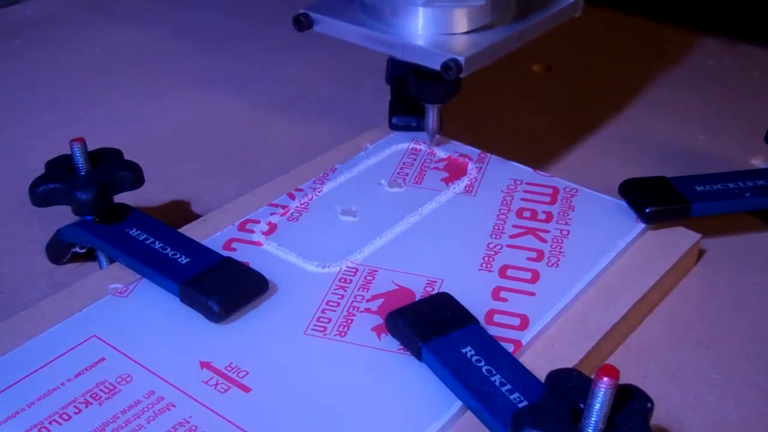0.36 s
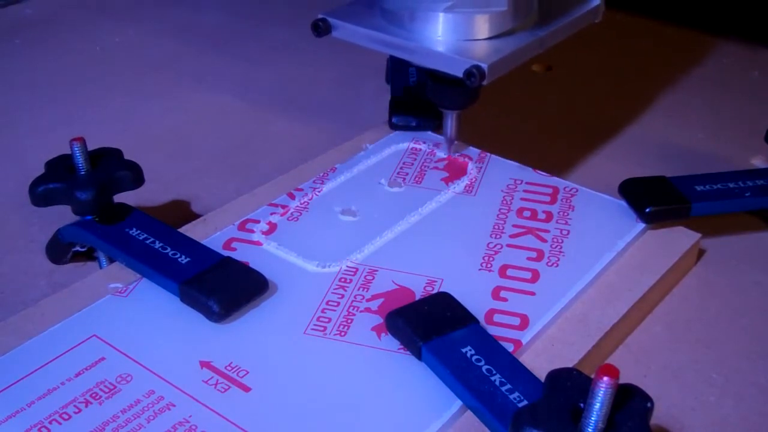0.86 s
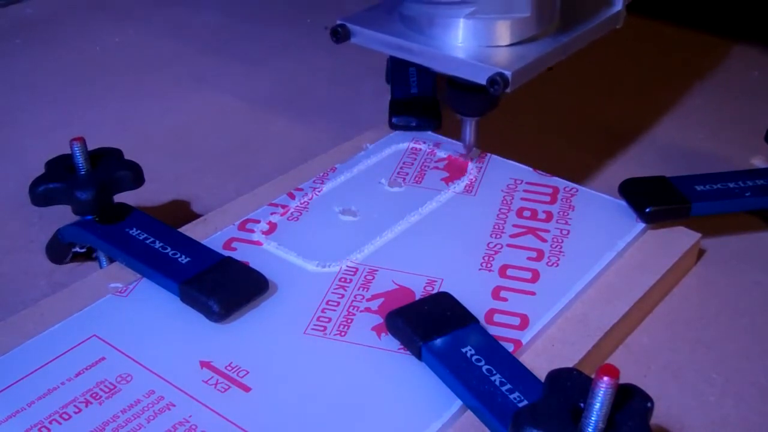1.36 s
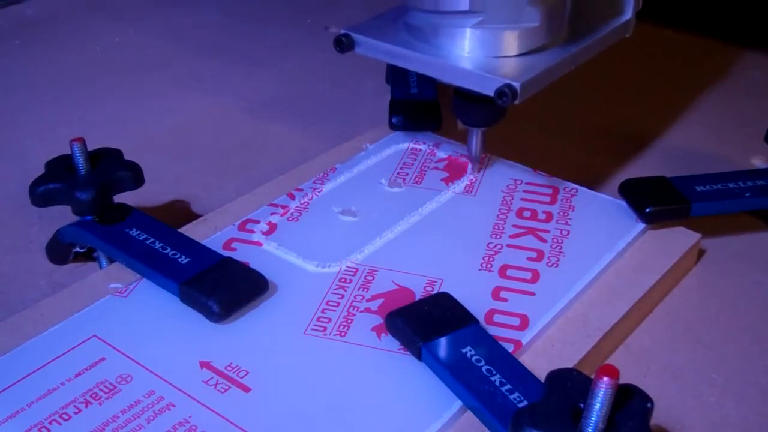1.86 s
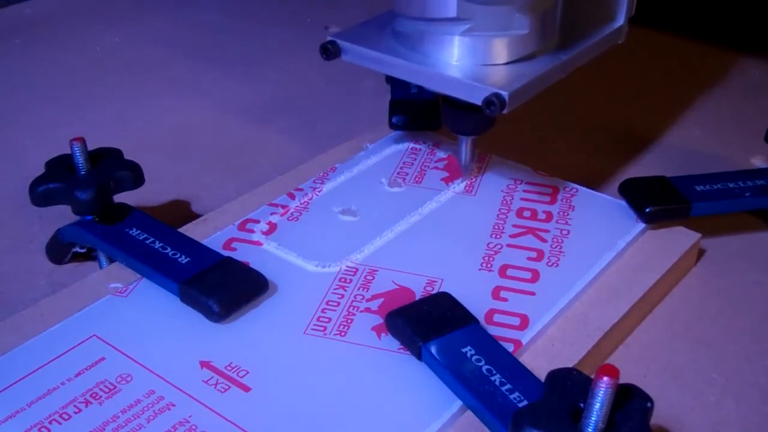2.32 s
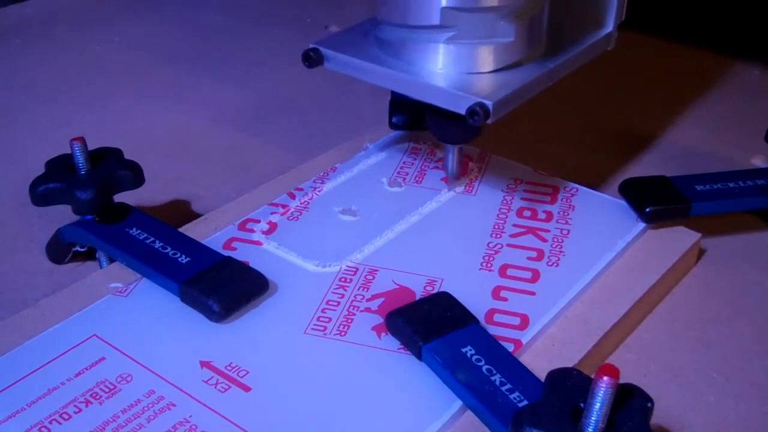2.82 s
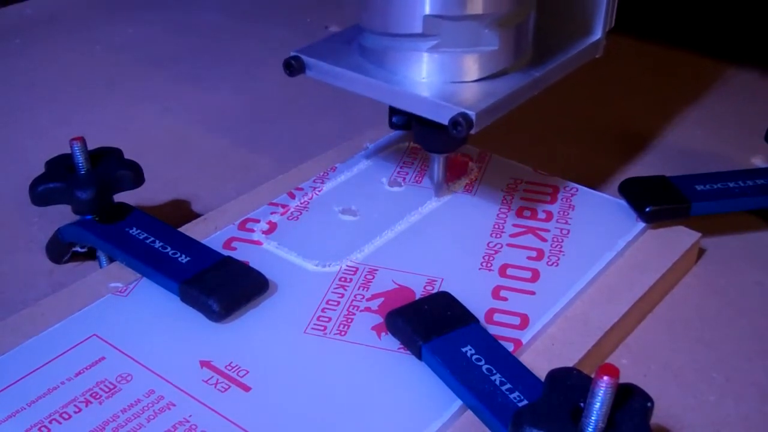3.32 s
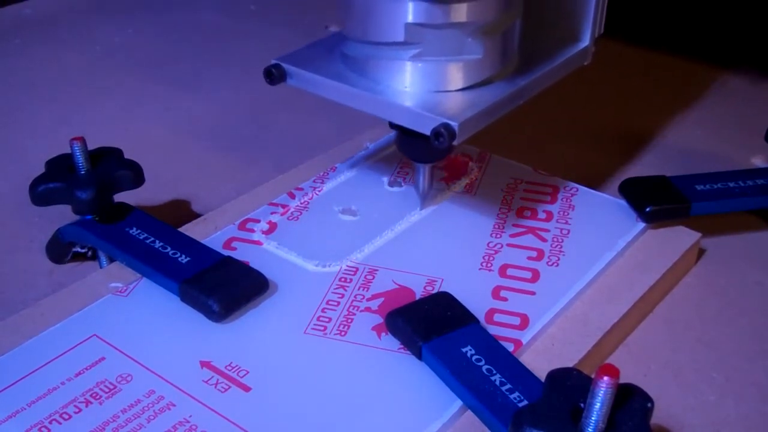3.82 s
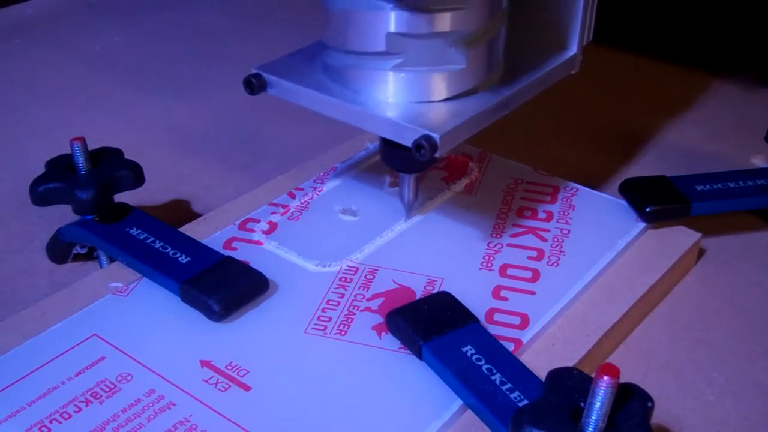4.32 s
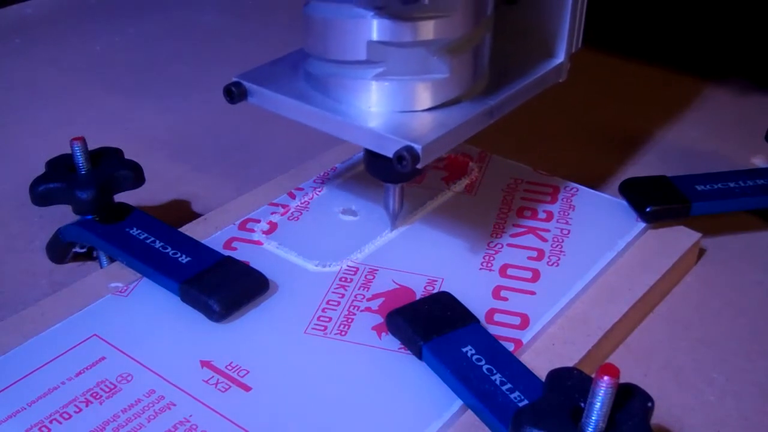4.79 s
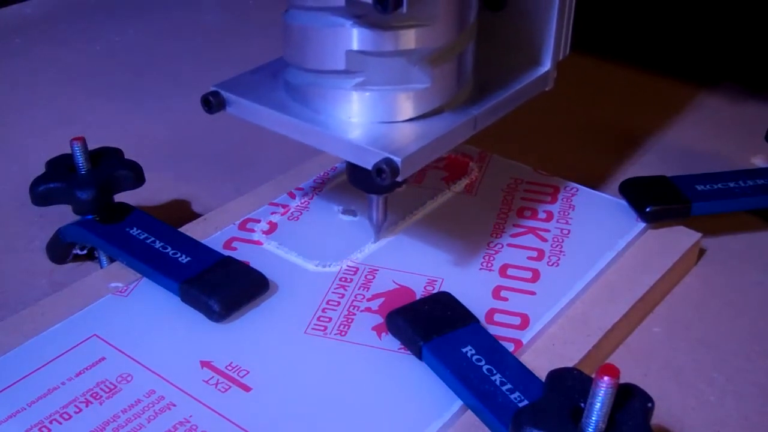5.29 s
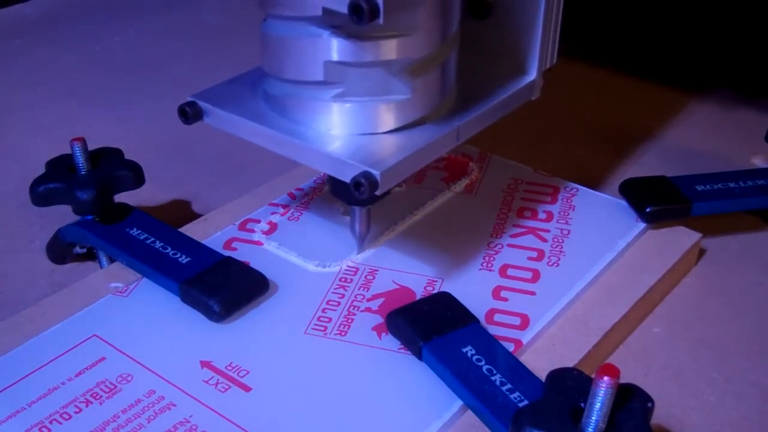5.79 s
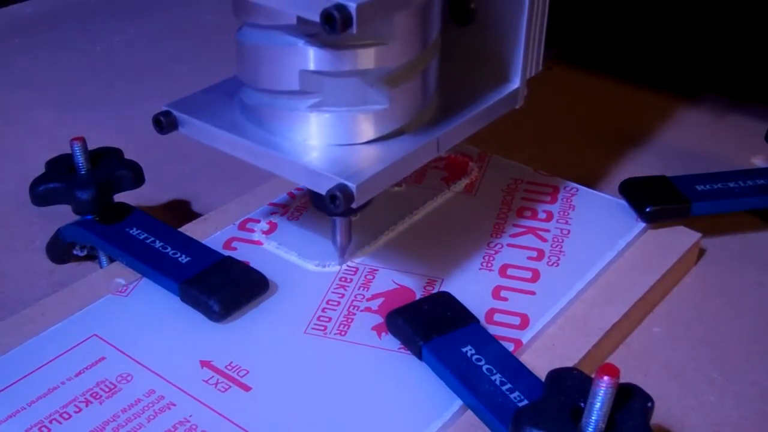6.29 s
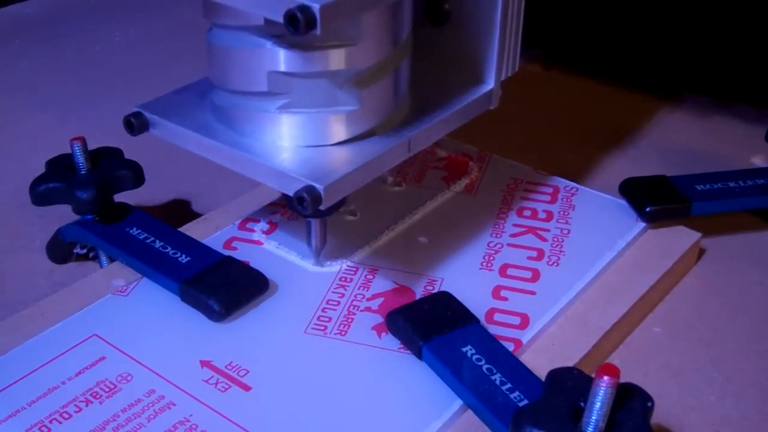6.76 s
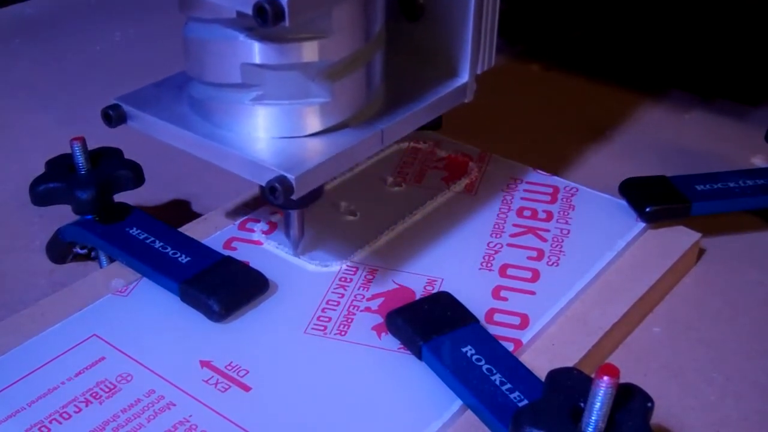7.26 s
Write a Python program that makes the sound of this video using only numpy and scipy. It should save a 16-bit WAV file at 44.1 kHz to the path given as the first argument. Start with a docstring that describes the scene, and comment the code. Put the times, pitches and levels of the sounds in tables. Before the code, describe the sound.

A router spindle already at full speed whines on a steady stack of clean tones, wrapped in a strong, bright hiss of cooling air. Underneath, soft axis motors hum low, sagging in pitch at turns near the start, before two seconds and late on. The hiss changes colour as the head travels. Close stereo pickup in a workshop, left side louder, no start or stop.

```python
"""A router spindle spins at full speed and follows a groove in a clamped plastic sheet.
Shaft and ball bearing whine in clean sines on multiples of the shaft angle; cooling air roars as
coloured stereo noise. The axis motors hum at their own step rate, gliding at the corners.
The colour shifts as the head travels; the left microphone faces the machine."""
import sys
import numpy as np
from scipy import signal
from scipy.fft import rfft, irfft, next_fast_len
from scipy.io import wavfile

SR = 44100
rng = np.random.default_rng(int(sys.argv[2]) if len(sys.argv) > 2 else 0)


def ratio_of_db(decibels):
    """Turn decibels (scalar or array-like) into linear amplitude factors; 0 dB maps to 1."""
    return 10 ** (np.asarray(decibels, float) / 20)


def pcm_store(signal):
    """Save signal as 16-bit PCM."""
    levels = np.round(np.clip(np.atleast_2d(signal), -1, 1) * 32767)
    wavfile.write(sys.argv[1], SR, levels.astype(np.int16).T)


N = 336471


def in_time(rows):
    """Columns of a table, after its time column, as sample-by-sample curves."""
    time_s, *columns = np.transpose(rows)
    return [np.interp(np.arange(N) / SR, time_s, column) for column in columns]


def at_hz(hz, table, column=1):
    """Reads a column of a spectrum on a log frequency axis."""
    rows = np.array(table)
    return np.interp(np.log(hz + 1e-9), np.log(rows[:, 0]), rows[:, column])


def drift(rate_hz):
    """Slow chance of spread 1: noise through a two-pole lowpass at SR / 40, then interpolated."""
    pole = np.exp(-80 * np.pi * rate_hz / SR)
    noise = rng.standard_normal(N // 40 + 2002)
    slow = signal.lfilter([1], [1, -2 * pole, pole * pole], noise)[2000:]   # settled part
    return np.interp(np.arange(N) / 40, np.arange(len(slow)), slow / slow.std())


# spindle speed: time_s, turns_per_s
SPINDLE_SPEED = [(0.1, 512.9), (0.6, 513.2), (1.9, 515.4), (3.4, 515.15), (5.8, 515.72), (7.4, 515.3)]


def shaft_angle():
    """Shaft angle in radians, the running sum of the spindle speed."""
    return 2 * np.pi * np.cumsum(in_time(SPINDLE_SPEED)[0]) / SR


# air roar at the microphones, before shading:
# pitch_hz, left_db_per_hz, right_db_per_hz, likeness (0-1), right_lead_rad
AIR_SPECTRUM = [(40, -103, -106, 0, 0.56), (90, -102, -108, 0, -0.12), (153, -92.5, -101, 0.17, -0.003),
                (480, -86.5, -96, .44, -0.64), (770, -83.5, -89, 0.66, 0.52),
                (1380, -83.5, -86.5, 0.5, -0.68), (2240, -77, -80, 0.86, -0.12),
                (3415, -73.5, -77.5, 0.71, -0.41), (4640, -65.5, -71, 0.93, 0.85),
                (5500, -64.5, -71, 0.89, -0.43), (6120, -66.5, -72, 0.84, -0.42),
                (7010, -73.5, -79, 0.59, 0.25), (9150, -73.5, -85.5, 0.47, 0.23),
                (10870, -80.5, -92, 0.3, 1.7), (11960, -91, -91, 0.6, 1.55), (13700, -95, -97.5, 0.5, 1.4)]
# housing resonances in the roar: centre_hz, width_hz, peak_db
HOUSING_RESONANCES = [(1549, 180, 7), (1106, 160, 3), (9270, 230, 2.0)]


def roar_spectrum(hz, size):
    """Turbulence as Gaussian noise, coloured per side, partly alike and phase-shifted between sides."""
    shared, apart = rfft(rng.standard_normal((2, size))) * np.sqrt(SR / 2)
    alike = np.clip(at_hz(hz, AIR_SPECTRUM, column=3), 0, 0.99)
    shared = np.sqrt(1 + alike) * shared
    apart = np.sqrt(1 - alike) * apart
    left = (shared + apart) * ratio_of_db(at_hz(hz, AIR_SPECTRUM, column=1))
    right = (shared - apart) * ratio_of_db(at_hz(hz, AIR_SPECTRUM, column=2))
    right = right * np.exp(1j * at_hz(hz, AIR_SPECTRUM, column=4))
    peaks_db = sum(peak_db / (1 + (2 * (hz - centre_hz) / width_hz) ** 2)
                   for centre_hz, width_hz, peak_db in HOUSING_RESONANCES)
    return np.array([left, right]) * ratio_of_db(peaks_db) / np.sqrt(2)


# head travel: time_s, bearing (-1 near side .. 1 far side), roar_db, treble_db, rumble_db
HEAD_TRAVEL = [(0.0, 0.17, 0.9, -0.26, -3), (0.38, 0.33, 1.1, .5, -0.5), (0.76, .7, 0, -0.47, -6.5),
               (1.14, 1, 0.2, -.2, -4), (1.55, 0.94, -0.5, -1.9, 6), (2.0, 0.71, -1, 0.21, 3.5),
               (2.6, 0.36, -0.6, 0, -2), (3.05, 0.2, -1, .1, -2), (3.6, -0.17, -.5, .5, -1.5),
               (3.85, -0.021, 0, 0.37, -3), (4.3, -0.47, 0.05, 1.5, 1), (5.0, -.6, -.5, -0.19, 1),
               (5.4, -0.55, -1, -.3, 2), (6.1, -.9, 0.2, .8, 3), (6.5, -0.73, 0, 0.23, 4.5),
               (7.0, -1.2, 0.8, -0.83, 5), (7.63, -1.0, 0.8, -0.24, 2)]
# roar regions: pitch_hz, gain_db at bearing 1, roar_share, treble_share, rumble_share
ROAR_SHADE = [(100, -1.5, .1, 0, 0.81), (400, -0.4, .8, 0.54, 0.35), (1380, 0.5, 0, 0.6, 0.087),
              (2500, 1.5, 1.9, 0, 0), (3500, 0.4, 1.5, 0.33, 0), (4700, -1, 0.56, 0.04, 0),
              (5160, -0.7, 0.8, 0.35, 0.081), (6200, 2.5, .4, 0.093, 0.12), (7100, 1.2, 1.8, 0, 0.19),
              (8200, 0, 0, 1.4, 0), (9400, 0.1, 0.014, 0.82, 0.019), (12000, 0, 0.21, 0, 0)]
# unsteadiness of the roar: pitch_hz, spread_db
ROAR_FLUTTER = [(100, 3.5), (400, 1.5), (3000, .5), (9000, 0.6), (12000, 0.9)]
# phase swing of the right side: pitch_hz, swing_rad at bearing 1
PHASE_SWING = [(3000, 0.28), (5500, 0.36), (9400, 0.58), (12000, 0.66)]


def air(shaft, throb):
    """Cooling-air turbulence, shaded region by region as the head travels, throbbing once a turn."""
    size = next_fast_len(N)
    hz = np.arange(size // 2 + 1) * SR / size
    roar = roar_spectrum(hz, size)
    bearing, *levels_db = in_time(HEAD_TRAVEL)
    log_regions = np.log(np.array(ROAR_SHADE)[:, 0])
    out = 0
    for k, (region_hz, facing_db, *shares) in enumerate(ROAR_SHADE):
        # triangular band around region_hz
        region = np.interp(np.log(hz + 1e-9), log_regions, np.arange(len(ROAR_SHADE)) == k)
        shade_db = facing_db * bearing + np.dot(shares, levels_db)
        flutter_db = at_hz(region_hz, ROAR_FLUTTER) * drift(11.5)
        part = irfft(roar * region, size)[:, :N]
        quadrature = irfft(1j * roar[1] * region, size)[:N]
        turn_rad = at_hz(region_hz, PHASE_SWING) * bearing
        part[1] = part[1] * np.cos(turn_rad) + quadrature * np.sin(turn_rad)
        out = out + part * ratio_of_db(shade_db + flutter_db)
    return out * (1 + throb * np.sin(shaft))


# stereo placement of tones: pitch_hz, left_minus_right_db
TONE_PAN = [(190, 2), (515, 2.5), (1030, 4.0), (1600, 3), (2600, 3), (6200, 5.7), (12400, 14)]


def tone(angle, level_db, waver_db):
    """A sine of rms level_db, wavering slowly, placed left by its mean pitch."""
    mean_hz = abs(angle[-1]) / (2 * np.pi) * SR / N
    pan_db = at_hz(mean_hz, TONE_PAN)
    gain = np.sqrt(2) * ratio_of_db(level_db + waver_db * drift(3.5))
    wave = gain * np.sin(angle + rng.uniform(0, 2 * np.pi))
    sides = ratio_of_db(np.array([[pan_db / 2], [-pan_db / 2]]))
    return wave * sides / sides.mean()


# strongest tones as the head travels: time_s, order_1_db, order_2_db, order_4_db, ball_pass_db
STRONG_TONES = [(0.05, -57.5, -56.5, -49, -47.5), (0.2, -48.5, -61, -56, -49.5),
                (0.38, -49.5, -47.5, -58, -47.5), (0.65, -52.5, -51, -57.5, -50),
                (1.1, -50, -48.5, -53, -51), (1.55, -50.5, -48, -52.5, -51.5), (2.0, -51, -49, -62, -57.5),
                (2.5, -51.5, -51, -56.5, -52.5), (3.1, -52.7, -52, -70, -50.5),
                (3.6, -52.5, -51.5, -59, -50.5), (4.1, -51, -54.5, -58, -47.5),
                (4.8, -50.5, -54, -63, -47.5), (5.5, -50, -56, -63, -50.5), (6.2, -50.5, -52.5, -82, -49.5),
                (6.8, -53, -57, -58, -51), (7.58, -52.5, -66, -65, -48)]
# tones that swell and fade through reflections:
# shaft_order, ball_pass_multiple, direct_db at the start, growth_db_per_s, loudest_s, swell_period_s
FADING_TONES = [(3, 0, -63, -.2, 4.45, 2.85), (5, 0, -65, .8, 4.35, 3.1), (2, 1, -61, -.2, 3.9, 4.2),
                (0, 2, -61, -.5, 3.3, 6.5), (16, 0, -67, 0, 4.3, 2.9), (24, 0, -81, .4, 6.9, 7)]
# tones that only waver: shaft_order, ball_pass_multiple, level_db
FAINT_TONES = [(6, 0, -72), (8, 0, -63), (-1, 1, -78), (1, 1, -68), (3, 1, -69), (-4, 2, -76), (-3, 2, -85)]
# whine of the twelve fan blades, heard when the head faces the microphones: time_s, level_db
BLADE_WHINE = [(0.0, -58), (1.4, -63), (4.3, -67), (5.9, -64), (6.2, -51), (7.63, -53)]
BALL_PASS = 3.0735   # balls crossing a spot on the bearing race, per turn
REFLECTION = 0.7   # amplitude ratio, reflected to direct


def spindle(shaft):
    """Unbalance and fan sound on whole shaft orders; the bearing adds a tone between them, with its sums."""
    t = np.arange(N) / SR
    out = tone(12 * shaft, in_time(BLADE_WHINE)[0], waver_db=1.5)
    for order, level_db in zip([1, 2, 4, BALL_PASS], in_time(STRONG_TONES)):
        out = out + tone(order * shaft, level_db, waver_db=0.3)
    for order, balls, direct_db, growth_db_per_s, loudest_s, period_s in FADING_TONES:
        direct = tone((order + balls * BALL_PASS) * shaft, direct_db + growth_db_per_s * t, waver_db=0.5)
        path_rad = 2 * np.pi * (t - loudest_s) / period_s
        out = out + direct * np.sqrt(1 + REFLECTION ** 2 + 2 * REFLECTION * np.cos(path_rad))
    for order, balls, level_db in FAINT_TONES:
        out = out + tone((order + balls * BALL_PASS) * shaft, level_db, waver_db=3.0)
    return out


# corners where the motors slow down: slowest_s, step_rate_hz
CORNER_RATES = [(0.0, 140), (1.7, 118), (6.68, 146)]
CRUISE_HZ = 190.8   # step rate on a straight cut
BRAKE_S, SPEED_UP_S = 0.36, 0.5


def step_rate():
    """Step rate in Hz: cruise, even braking into each corner, easing back up after it."""
    t, step_hz = np.arange(N) / SR, CRUISE_HZ
    for slowest_s, slow_hz in CORNER_RATES:
        braking = np.clip(1 + (t - slowest_s) / BRAKE_S, 0, 1)
        speeding_up = np.clip(1 - (t - slowest_s) / SPEED_UP_S, 0, 1) ** 2
        step_hz = step_hz - (CRUISE_HZ - slow_hz) * np.where(t < slowest_s, braking, speeding_up)
    return step_hz


# axis motors taking turns along the path: time_s, hum_db, octave_db, cutter_shake_db before corner easing
AXIS_LEVELS = [(0.0, -98, -86, -78), (0.3, -87, -79, -76), (0.6, -86, -84, -73), (1.2, -82, -77, -74),
               (1.45, -90, -78, -72), (1.72, -80, -74, -72), (1.88, -72, -72, -70), (2.05, -71, -67.5, -68),
               (2.8, -74, -72, -67.5), (4.0, -76, -72.5, -67.5), (4.4, -68.5, -76, -65),
               (5.6, -66, -79, -64), (6.35, -67, -73, -70), (6.5, -71, -68, -72), (6.7, -83, -80, -74),
               (6.85, -69, -87, -76), (7.05, -92, -86, -79), (7.4, -74, -84, -82), (7.63, -82, -86, -77)]
# stepping shakes the cutter and beats with the shaft: shaft_order, step_multiple, db_from_shake
SHAKE_BEATS = [(2, -1, -0.5), (1, 1, -6), (1, -1, -13), (0, 4, -11.5), (0, 3, -12)]
CORNER_SHAKE_DB = -16   # limit of the shake's easing in a corner


def axes(shaft):
    """Steppers hum at the step rate and its octave; their shake adds tones at sums with shaft orders."""
    step_hz = step_rate()
    hum_db, octave_db, shake_db = in_time(AXIS_LEVELS)
    shake_db = shake_db + CORNER_SHAKE_DB * np.tanh((CRUISE_HZ - step_hz) / 25)
    step = 2 * np.pi * np.cumsum(step_hz) / SR
    out = tone(step, hum_db, waver_db=0.6) + tone(2 * step, octave_db, waver_db=1.2)
    for order, steps, db_from_shake in SHAKE_BEATS:
        out = out + tone(order * shaft + steps * step, shake_db + db_from_shake, waver_db=0.6)
    return out


# brief dips of the whole level: start_s, swell_db, dip_db, recovery_s
LEVEL_DIPS = [(3.45, 1, -2, 0.2)]


def level_curve_db():
    """The whole level swells just before each dip, drops quickly and recovers exponentially."""
    t = np.arange(N) / SR
    level_db = 0
    for start_s, swell_db, dip_db, recovery_s in LEVEL_DIPS:
        level_db = level_db + swell_db * np.exp(-((t - start_s + 0.02) / 0.02) ** 2)
        drop = np.clip((t - start_s) / 0.02, 0, 1)
        level_db = level_db + dip_db * drop * np.exp(-np.maximum(t - start_s, 0) / recovery_s)
    return level_db


def scene():
    """Air throbbing with the shaft, spindle tones on it, axis motors at their step rate beating with it."""
    shaft = shaft_angle()
    return air(shaft, throb=0.04) + spindle(shaft) + axes(shaft)


def low_pass(x):
    """Removes everything above the highest recorded frequency."""
    return signal.sosfilt(signal.butter(12, 14150, fs=SR, output="sos"), x)


def record(dry):
    """Applies the level curve to both sides and returns the finished sound."""
    mix = dry * ratio_of_db(level_curve_db())
    return low_pass(mix)


dry = scene()
out = record(dry)
pcm_store(out)
```